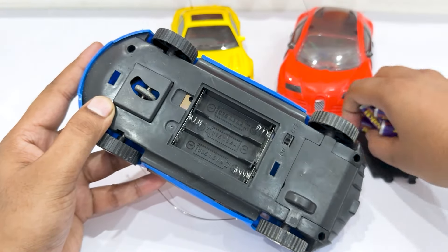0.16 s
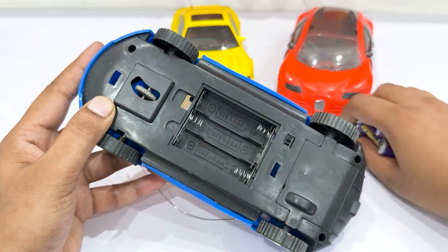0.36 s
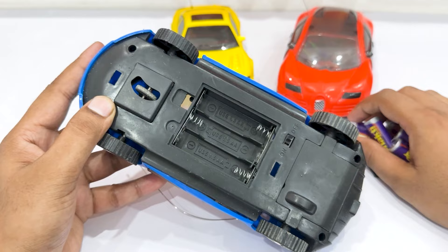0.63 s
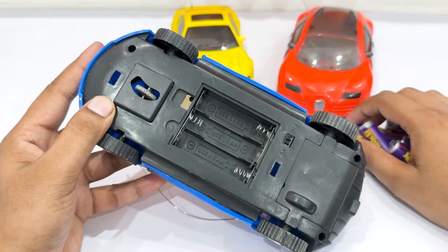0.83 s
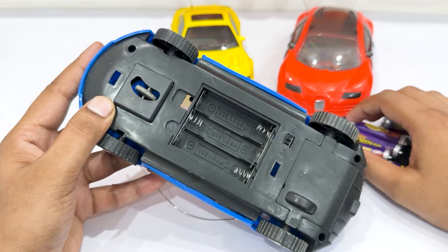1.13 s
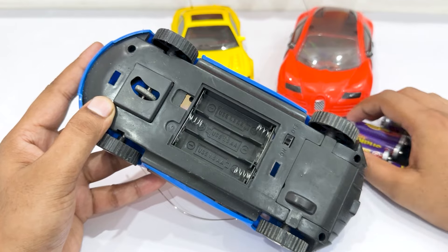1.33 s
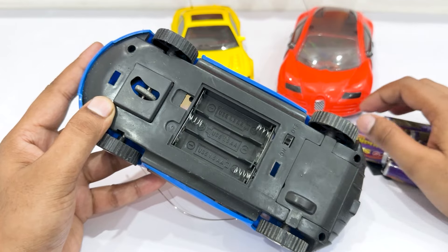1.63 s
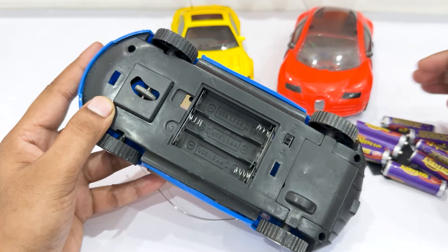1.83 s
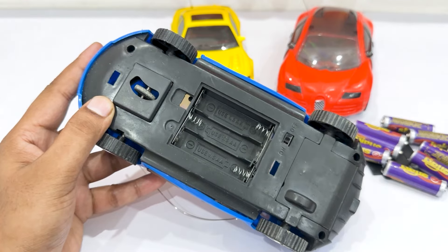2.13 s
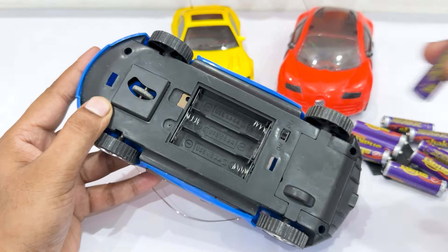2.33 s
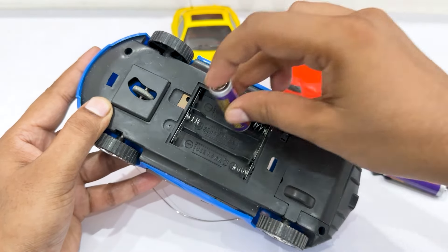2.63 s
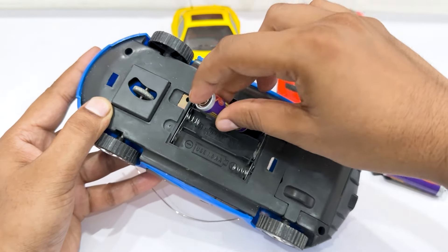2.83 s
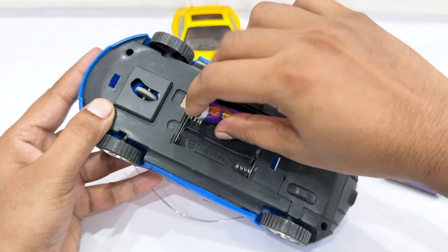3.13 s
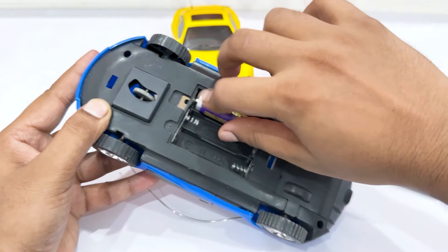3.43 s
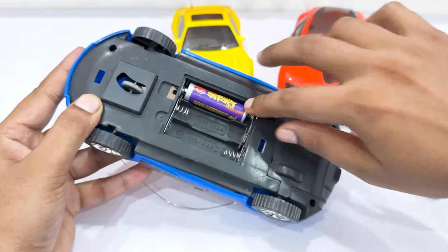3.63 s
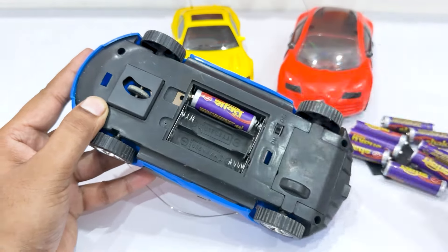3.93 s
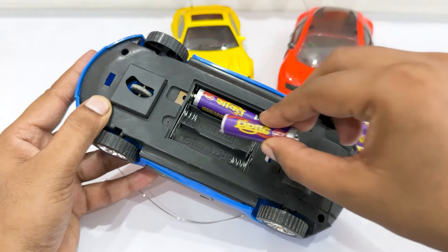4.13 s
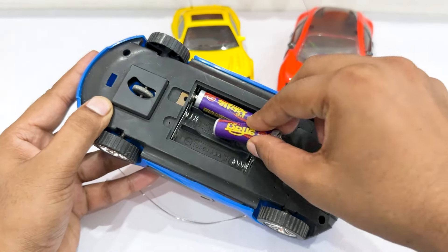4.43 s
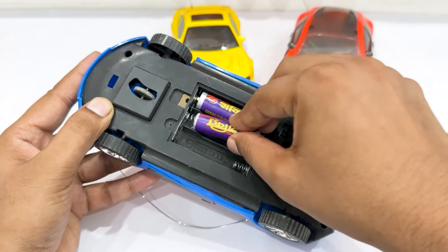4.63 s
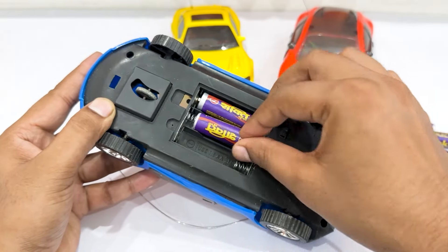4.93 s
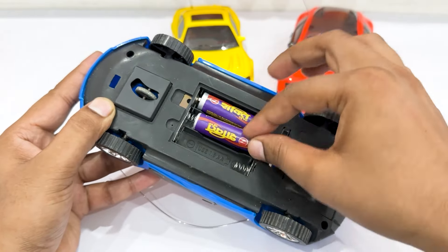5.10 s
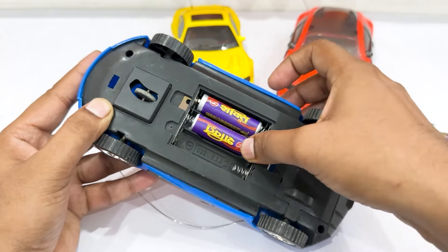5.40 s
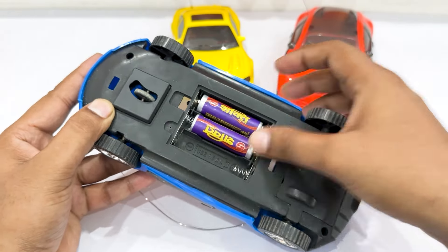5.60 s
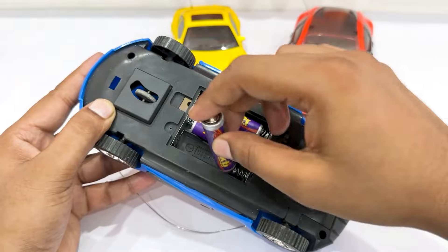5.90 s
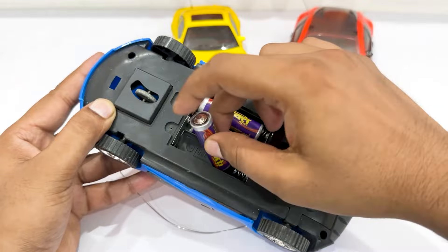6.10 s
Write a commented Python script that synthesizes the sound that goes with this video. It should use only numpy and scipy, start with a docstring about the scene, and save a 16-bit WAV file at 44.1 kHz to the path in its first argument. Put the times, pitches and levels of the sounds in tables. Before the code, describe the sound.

Close stereo sound of batteries being handled indoors. First a busy cluster of hard, woody clacks as loose batteries land and jostle on a table, over soft low bumps. After a brief lull, quieter separate clicks of batteries seating in a hollow plastic toy compartment, the brightest pair midway, with slight spring ring and brief rubbing. Quiet rumble runs throughout, with short room reflections.

```python
"""A low room rumble runs throughout; fingers rub now and then over plastic. A hand sets down a fistful of
small batteries that clack and jostle on a table: noise bursts ring damped modes. Dull bumps are decaying
low sines with a noise shudder. The batteries then go one by one into a toy car's plastic compartment: shell
modes click and a contact spring rings. A very faint rising squeak, a jittered sine, comes amid these clicks.
The room is small, the microphone pair close."""
import sys
import numpy as np
from scipy import signal
from scipy.fft import rfft, irfft, next_fast_len
from scipy.io import wavfile

SR = 44100
rng = np.random.default_rng(int(sys.argv[2]) if len(sys.argv) > 2 else 0)


def pcm_store(signal):
    """Save signal as 16-bit PCM."""
    levels = np.round(np.clip(np.atleast_2d(signal), -1, 1) * 32767)
    wavfile.write(sys.argv[1], SR, levels.astype(np.int16).T)


N = 276066
TIME = np.arange(N) / SR
AGE = np.arange(SR // 4) / SR  # seconds since a contact

# modes of batteries on the table top: f/Hz, relative level/dB, t60/s
TABLE_MODES = [(378, -7, 0.028), (657, -11, 0.08), (846, -3.5, 0.058), (1031, -7.5, 0.08),
               (1530, -10.5, 0.13), (1954, -2, 0.022), (2410, -14.5, 0.031), (2705, -10.5, 0.11),
               (3535, -15, 0.18), (4100, -1, 0.021), (5120, -23, 0.07)]


def amp(db):
    """Decibels to gain."""
    return 10 ** (np.asarray(db) / 20)


def unit(x):
    """Scale to rms 1."""
    return x / np.sqrt(np.mean(x ** 2) + 1e-20)


def blow(x):
    """Scale a hit to rms 1 over its first 10 ms."""
    return x / np.sqrt(np.mean(x[..., :SR // 100] ** 2) + 1e-20)


def along(points, hz):
    """Interpolate (f/Hz, value) points on a log frequency axis."""
    f, v = np.transpose(points)
    return np.interp(np.log(hz + 1), np.log(f), v)


def filtered(x, response):
    """Apply a frequency response by FFT."""
    n = x.shape[-1]
    m = next_fast_len(n + 8192)
    spectrum = rfft(x, m) * response(np.fft.rfftfreq(m, 1 / SR))
    return irfft(spectrum, m)[..., :n]


def band(x, edges_hz, kind, order=3):
    """Causal Butterworth filter."""
    sos = signal.butter(order, edges_hz, kind, fs=SR, output="sos")
    return signal.sosfilt(sos, x)


def through(x, response):
    """Convolve each channel, keeping the length."""
    return signal.fftconvolve(x, np.atleast_2d(response), axes=1)[:, :x.shape[1]]


def add(track, s, sound):
    """Mix a sound into a track at time s."""
    part = track[:, round(s * SR):][:, :sound.shape[-1]]
    part += sound[..., :part.shape[-1]]


def pair(width, size):
    """Left and right white noise, less alike as width grows from 0 to 1."""
    mid, side = rng.standard_normal((2, size))
    return np.array([mid + width * side, mid - width * side])


def touches(rate_hz, size, width):
    """Random tiny impacts at a mean rate: many small ones and a few large."""
    happens = rng.random(size) < rate_hz / SR
    strength = rng.exponential(size=size)
    return unit(happens * strength * pair(width, size))


def fade(t60_s):
    """Exponential decay after a contact."""
    return amp(-60 * AGE / t60_s)


def ring(modes):
    """Impulse response of damped modes, with alternating signs."""
    response = np.zeros(len(AGE))
    for k, (hz, db, t60_s) in enumerate(modes):
        response += (-1) ** k * amp(db) * fade(t60_s) * np.cos(2 * np.pi * hz * AGE)
    return response


def shifted(modes, spread):
    """The same modes, each at a slightly different pitch."""
    return [(hz * np.exp(spread * rng.standard_normal()), db, t60_s) for hz, db, t60_s in modes]


def room(x, early_db, tail_db):
    """Add a few near reflections and a diffuse tail whose decay depends on frequency."""
    # tail decay: f/Hz, t60/s
    room_t60 = [(100, 1), (400, 0.28), (1200, 0.3), (4000, 0.24), (8000, 0.27), (15000, 0.031)]
    hz, t, z = signal.stft(rng.standard_normal((2, SR // 2)), SR, nperseg=256)
    decay = amp(-60 * t / along(room_t60, hz)[:, None])
    build_up = 1 - np.exp(-t / 0.015)
    tail = signal.istft(z * decay * build_up, SR, nperseg=256)[1]
    near = np.zeros_like(tail)
    for side in near:
        delays_s = rng.uniform(.002, .025, size=12)
        side[(delays_s * SR).astype(int)] = rng.standard_normal(size=12)
    answer = amp(tail_db) * tail / np.linalg.norm(tail[0])
    answer = answer + amp(early_db) * near / np.linalg.norm(near[0])
    x = np.pad(x, ((0, 0), (0, SR // 4)))
    return x + through(x, answer)


def air():
    """Steady room rumble: shaped noise, nearly mono in the bass."""
    # spectrum: f/Hz, relative density/dB
    rumble_spectrum = [(18, -45.5), (30, -15.5), (53, -5), (106, -3.5), (145, -12.5), (207, -8),
                       (251, -15.5), (276, -11.5), (304, -17), (404, -9.5), (526, -20), (932, -17),
                       (1180, -23.5), (1400, -18), (1650, -29.5), (2250, -30.5), (3300, -38), (4500, -47),
                       (9000, -59), (11700, -93), (19800, -120)]
    # left-right correlation: f/Hz, correlation (-1 to 1)
    likeness = [(60, 0.78), (180, 0.93), (550, 0.16), (1650, 0.19), (4970, -0.87), (15000, 0.89)]

    def mid_side_gains(hz):
        angle = np.arccos(np.clip(along(likeness, hz), -1, 1)) / 2
        return amp(along(rumble_spectrum, hz)) * np.array([np.cos(angle), np.sin(angle)])

    mid, side = filtered(rng.standard_normal((2, N)), mid_side_gains)
    return amp(-44.5) * unit(np.array([mid + side, mid - side]))


def rubbing():
    """Fingers and sleeves slide over plastic: a hiss of tiny slips that swells with each stroke."""
    # strokes of skin and battery sleeves: middle t/s, half length to 1/e /s, level/dB, treble tilt/(dB/octave)
    strokes = [(0.126, 0.042, -54.5, 3.5), (0.303, 0.14, -62, -7.5), (1.745, 0.019, -60.5, -8),
               (2.835, .03, -50, -12), (3.137, 0.093, -59.5, -10), (3.237, 0.011, -50.5, -4),
               (3.372, .011, -35.5, -11.5), (3.511, 0.035, -46, -5), (3.708, 0.023, -54.5, -9),
               (3.82, 0.027, -58, -10.5), (4.39, .03, -58.5, -9), (4.58, 0.06, -46.5, -10.5),
               (4.865, 0.13, -72, -4), (5.587, 0.065, -58, -11), (5.939, 0.037, -55.5, -10.5)]
    # spectrum before the tilt: f/Hz, relative density/dB
    rub_spectrum = [(80, -42), (300, -9), (1300, 3), (2600, 2.5), (4400, 6.5), (7500, 3), (11000, -12),
                    (14500, 2.5), (17000, -20.5)]
    out = np.zeros((2, N))
    t = np.arange(SR // 2) / SR
    for s, half_s, db, tilt_db in strokes:
        slips = touches(1000, len(t), width=.6) + amp(0.5) * pair(.7, len(t))
        hiss = unit(filtered(slips, lambda hz: amp(along(rub_spectrum, hz) + tilt_db * np.log2(1 + hz / 500))))
        start_s = max(s - 2 * half_s, 0)
        swell = np.exp(-((start_s + t - s) / half_s) ** 2)
        add(out, start_s, amp(db) * hiss * swell)
    return room(out, early_db=3.0, tail_db=-12.5)[:, :N]


def rebounding(event, loss_db):
    """A contact and its one weaker, duller rebound a moment later."""
    s, db, pitch_hz, crack_db, tick_db = event
    dull_db = -4.5
    flight_s = .012 * np.exp(.25 * rng.standard_normal())
    return [event, (s + flight_s, db + loss_db, pitch_hz, crack_db + dull_db, tick_db + dull_db)]


def contact(event, modes, crack_t60_s, knock_t60_s, knock_db, raw_db, tick_t60_s, width, spread, rise_s):
    """A sharp impact and a burst of micro-impacts ring the body as knock and crack; a noise tick tops it."""
    # hard-contact tick: f/Hz, relative density/dB
    tick_spectrum = [(4000, -34.5), (6000, 8), (9300, 6), (11200, -8.5), (14000, 10), (16000, -5)]
    _, db, pitch_hz, crack_db, tick_db = event
    rise = 1 - np.exp(-AGE / rise_s)
    burst = pair(width, len(AGE)) * fade(.024) * rise
    burst[:, SR // 1000] += amp(-7) * np.linalg.norm(burst[0])  # first impact, re the chatter
    # the load of battery and fingers shifts every mode a little from hit to hit
    loaded = shifted(modes, spread)
    body = blow(through(burst, ring(loaded))) + amp(raw_db) * blow(burst)
    # the place struck picks one strongly damped main resonance, above which the knock falls away
    main = np.sin(2 * np.pi * pitch_hz * AGE) * fade(knock_t60_s) * rise
    thock = band(body, .3 * pitch_hz, "highpass", order=2)
    thock = band(thock, 1.75 * pitch_hz, "lowpass", order=5)
    knock = blow(blow(thock) + amp(knock_db) * blow(main))
    # soft contacts carry the crack less far into the treble
    reach_hz = np.clip(5700 * 2 ** ((tick_db - crack_db) / 38), 2900, 6500)
    crack_edges_hz = [min(1.75 * pitch_hz, 2100), reach_hz]
    crack = blow(band(body * fade(crack_t60_s), crack_edges_hz, "bandpass", order=4))
    tick = band(pair(0.69, len(AGE)) * fade(tick_t60_s) * rise, 3200, "highpass")
    tick = blow(filtered(tick, lambda hz: amp(along(tick_spectrum, hz))))
    return amp(db) * (knock + amp(crack_db) * crack + amp(tick_db) * tick)


def jostling_db():
    """Level of the loose batteries: each spell starts fast, holds and settles."""
    # spells of jostling: start t/s, length/s, level/dB
    spells = [(0.602, 0.027, -36), (0.86, 0.25, -33), (1.157, 0.042, -25.5), (1.922, 0.015, -36)]
    stir_db_per_s, settle_db_per_s = 1502, 303
    levels_db = []
    for s, length_s, db in spells:
        before_s = np.maximum(s - TIME, 0)
        after_s = np.maximum(TIME - s - length_s, 0)
        levels_db.append(db - stir_db_per_s * before_s - settle_db_per_s * after_s)
    return np.max(levels_db, axis=0)


def loose_batteries(count, spread):
    """Tiny touches of several batteries, each ringing the table's modes at slightly different pitches."""
    out = np.zeros((2, N))
    for _ in range(count):
        grains = touches(260, N, width=0.86)
        out += unit(through(grains, ring(shifted(TABLE_MODES, spread)))) + amp(-9) * grains
    return unit(band(out, [400, 4600], "bandpass", order=2))


def pile():
    """Batteries clack on the table and each other, and jostle between the big hits."""
    # hits: t/s, knock level/dB, knock f/Hz, crack level re knock/dB, tick level re knock/dB
    landings = [(0.294, -49.5, 1500, -1, -0.5), (0.3883, -23, 770, -24, -29.5),
                (0.49, -30.5, 690, -42, -40), (0.558, -38.5, 830, -15, -15), (0.57, -46.5, 1260, 1, -2),
                (0.5965, -21.5, 1047, -10, -33.5), (0.631, -27, 1234, -18, -15),
                (0.653, -31, 1160, -12, -14.5), (0.8597, -20, 1033, -3, -21), (0.9, -20, 1140, -10, -20.5),
                (0.929, -26.5, 950, -22, -9), (0.965, -27, 1180, -8, -13), (0.9855, -21.5, 1065, -2.5, -16),
                (1.008, -22.5, 920, -4, -11), (1.0474, -20, 1072, -5.5, -11.5), (1.0751, -24, 896, -6, -18),
                (1.102, -25.5, 864, -9, -23), (1.1393, -17.5, 1025, -8.5, -16.5),
                (1.1644, -21.5, 1518, -2, -11), (1.178, -23.5, 1076, -2, -12),
                (1.204, -23, 1170, -3.5, -33), (1.904, -26, 1090, -11, -42), (1.931, -26, 1165, -18, -27),
                (1.948, -28.5, 1120, -5.5, -36)]
    out = np.zeros((2, N))
    for landing in landings:
        s = landing[0]
        clack = np.zeros((2, len(AGE)))
        for event in rebounding(landing, loss_db=-11.5):  # loose batteries rebound more than held ones
            hit = contact(event, TABLE_MODES, crack_t60_s=.045, knock_t60_s=0.045, knock_db=-3, raw_db=8,
                          tick_t60_s=0.018, width=0.62, spread=0.045, rise_s=0.00097)
            add(clack, event[0] - s, hit)
        add(out, s, room(clack, early_db=-10.5, tail_db=-10))
    jostle = loose_batteries(count=4, spread=0.0765) * amp(jostling_db())
    add(out, 0, room(jostle, early_db=-2.5, tail_db=-4))
    # the covering hand dulls the top
    hand_db = [(6000, -1.0), (9000, -1.5), (13000, -9.5)]
    return filtered(out, lambda hz: amp(along(hand_db, hz)))


def bumps():
    """Soft pushes boom the table over a deep shudder; higher ones wake its upper modes more."""
    # bumps of hand and toy on the table: t/s, level/dB, f/Hz
    pushes = [(0.389, -33.5, 119), (0.497, -26.5, 94), (0.599, -25, 97), (0.931, -18.5, 98),
              (1.02, -22, 96), (1.14, -25, 124), (2.044, -16.5, 73), (2.17, -28.5, 79.5),
              (3.006, -35.5, 72), (3.305, -24, 100), (3.445, -35.5, 145), (4.106, -33.5, 91),
              (4.357, -25, 105), (4.4, -22, 110), (5.345, -17, 106.5)]
    rock_s, rock_db = .07, -8.5  # each rocks back twice, weaker each time
    upper_modes = [(191.7, -7, 0.095), (243.2, -5, 0.17), (361.0, -15.5, 0.19)]  # f/Hz, level/dB, t60/s
    out = np.zeros((2, N))
    for s, db, pitch_hz in pushes:
        boom = np.sin(2 * np.pi * pitch_hz * AGE) * fade(.24)
        upper = (pitch_hz / 108) ** 4 * ring(upper_modes)
        for k in range(3):
            rumble = band(pair(.2, len(AGE)), [.5 * pitch_hz, 1.5 * pitch_hz], "bandpass", order=3)
            shudder = unit(rumble) * fade(.36)
            onset = 1 - np.exp(-AGE / 0.01)
            bump = (boom + upper + amp(-6.5) * shudder) * onset
            add(out, s + k * rock_s, amp(db + k * rock_db) * bump)
    return out


def compartment():
    """A battery clicks against the shell; the harder the tick, the louder the spring rings."""
    # clicks, before the stereo balance: t/s, knock level/dB, knock f/Hz, crack re knock/dB, tick re knock/dB
    clicks = [(2.712, -29, 1320, -7, -34), (2.846, -49, 1350, -10, -21), (3.093, -47.5, 1190, -2.5, -4.5),
              (3.161, -35, 754, -13, -23.5), (3.243, -42.5, 830, -1, -12), (3.263, -40, 800, -5.5, -8.5),
              (3.2994, -30.5, 846, -15, -26), (3.312, -30, 914, -16, -17), (3.3278, -45.5, 1180, 21, 22.5),
              (3.4337, -21.5, 1160, -9.5, -2.5), (3.4481, -20.5, 834, -12, -11),
              (4.358, -30, 880, -26, -31), (4.615, -23.5, 1208, -15, -13.5),
              (4.801, -40.5, 1130, -34, -21.5), (5.022, -44.5, 1000, -19.5, -31.5),
              (5.2886, -36, 1420, -10.5, -1), (5.318, -36, 1080, -10.5, -11),
              (5.3382, -25, 922, -11.5, -21.5), (5.8712, -32.5, 820, -16, -19.5),
              (5.907, -44, 940, -12, -41), (5.93, -40.5, 840, -12, -20), (6.082, -44, 640, 1.5, -8),
              (6.108, -51, 1240, 1, -6.5)]
    # modes of the plastic shell: f/Hz, relative level/dB, t60/s
    shell_modes = [(242, -13, 0.16), (363, -28.5, 0.12), (573, -11.5, 0.12), (755, 20, 0.087),
                   (1346, -0.5, 0.019), (1550, 1, 0.09), (2650, -8.5, 0.0083), (3056, 3.5, 0.059),
                   (4750, 1.5, 0.01), (6730, 77.5, 0.045), (9300, -2.5, 0.01), (14700, -26.5, 0.024)]
    # modes of the free contact spring: f/Hz, relative level/dB, t60/s
    spring_modes = [(2940, 9, 0.19), (3962, -6.5, .11), (4700, -2, .1), (5750, 17, 0.31), (6170, -2, .11),
                    (7950, -5.5, 0.23), (9028, -7, 0.081), (14200, -6.5, .07)]
    out = np.zeros((2, N))
    for click in clicks:
        s, db, _, _, tick_db = click
        squeezed = shifted(spring_modes, .05)  # pitch shifts with how far it is squeezed
        spring = blow(through(pair(1.0, len(AGE)) * fade(.003), ring(squeezed)))
        held = spring * fade(.12)  # the battery leans on it and damps it
        sound = amp(db + tick_db - 12) * held
        for event in rebounding(click, loss_db=-14.5):
            hit = contact(event, shell_modes, crack_t60_s=.024, knock_t60_s=0.033, knock_db=-1.5, raw_db=0.5,
                          tick_t60_s=0.013, width=0.53, spread=0.02, rise_s=0.00063)
            add(sound, event[0] - s, hit)
        add(out, s, room(sound, early_db=-11.5, tail_db=-16))
    return out * amp([[1.1], [-1.1]])  # left, right


def squeak():
    """A very faint thin squeak: a sine of rising pitch, roughened by random frequency jitter."""
    pitch_hz = np.interp(TIME, [4.19, 4.25, 4.34], [6700, 7350, 7800])
    pitch_hz = pitch_hz + 900 * rng.standard_normal(N)
    swell = np.exp(-((TIME - 4.26) / .08) ** 4)
    return amp(-78.5) * swell * np.sin(2 * np.pi * np.cumsum(pitch_hz) / SR)


def scene():
    """Sum all layers; clacks and clicks reach the left microphone slightly before the right."""
    lead_s = 5.5e-5
    sides = np.array([[1], [-1]])
    handling = filtered(pile() + compartment(), lambda hz: np.exp(1j * np.pi * hz * lead_s * sides))
    return air() + rubbing() + handling + bumps() + squeak()


def record(dry):
    """Drop the deepest rumble below 36 Hz and cut steeply above the band limit."""
    top_hz = 16550
    body = filtered(dry, lambda hz: 1 - 1 / (1 + (hz / 36) ** 4))
    return filtered(body, lambda hz: 1 / (1 + (hz / top_hz) ** 120))


dry = scene()
out = record(dry)
pcm_store(out)
```